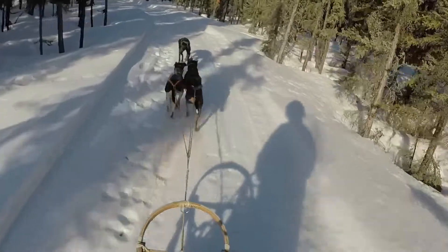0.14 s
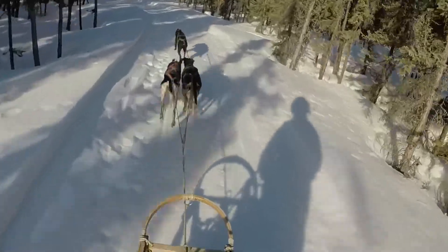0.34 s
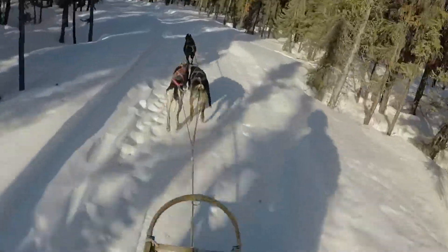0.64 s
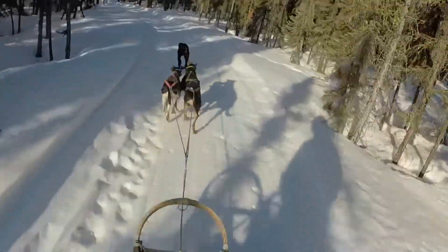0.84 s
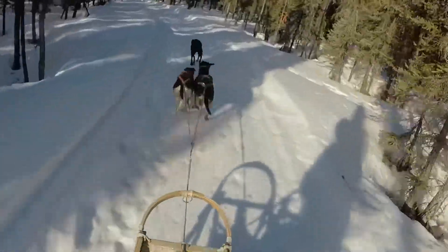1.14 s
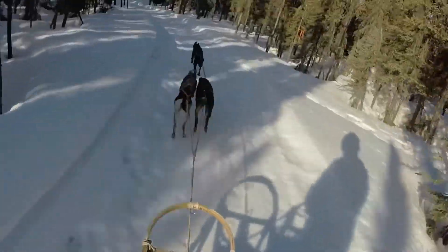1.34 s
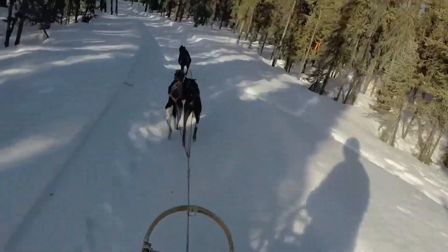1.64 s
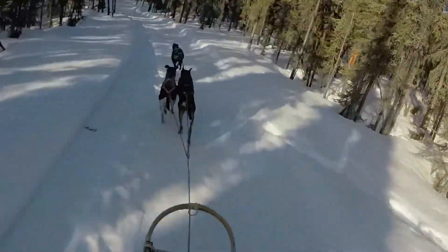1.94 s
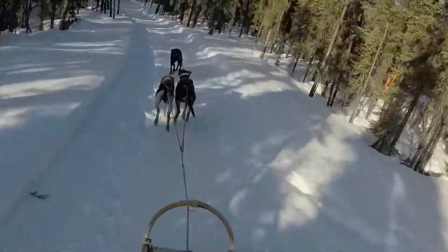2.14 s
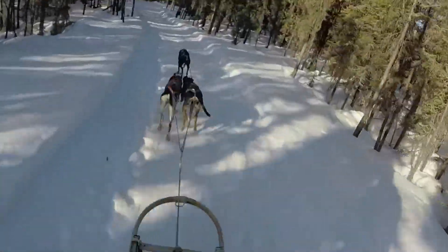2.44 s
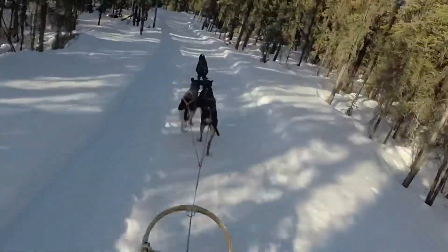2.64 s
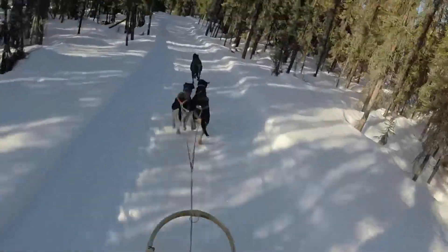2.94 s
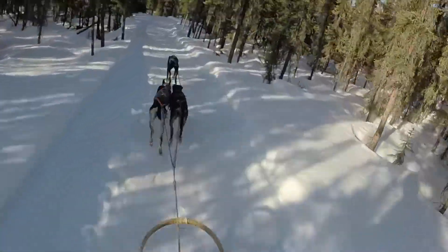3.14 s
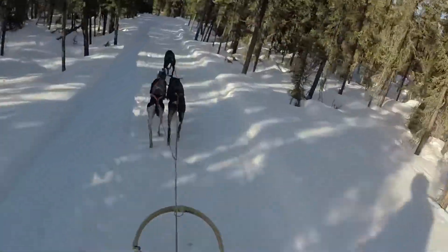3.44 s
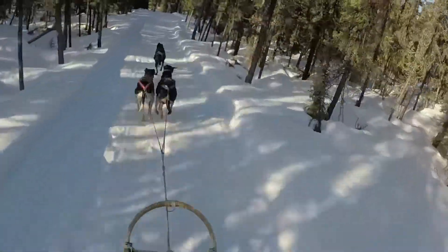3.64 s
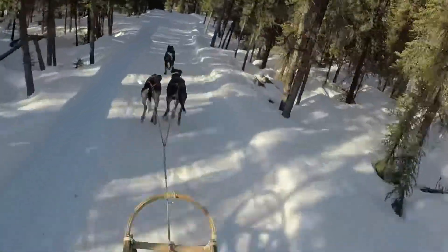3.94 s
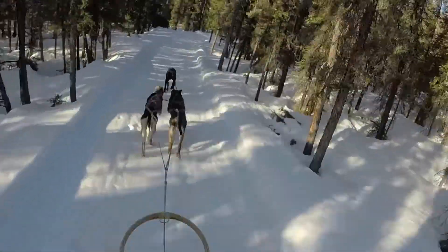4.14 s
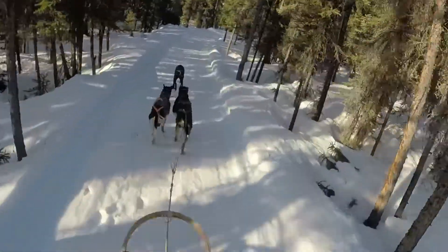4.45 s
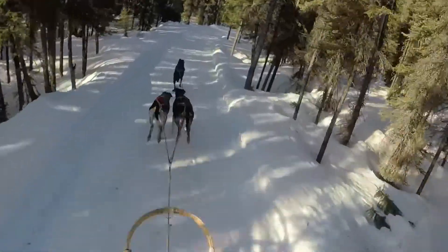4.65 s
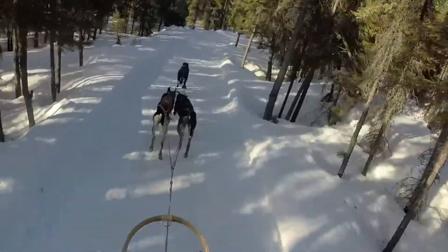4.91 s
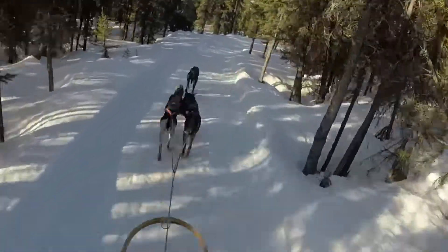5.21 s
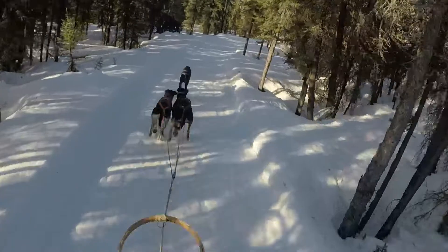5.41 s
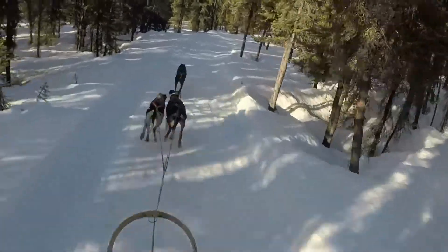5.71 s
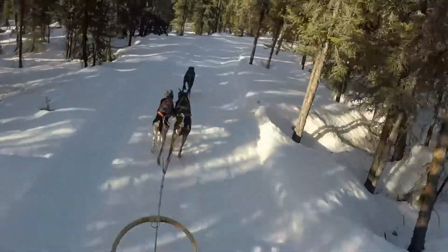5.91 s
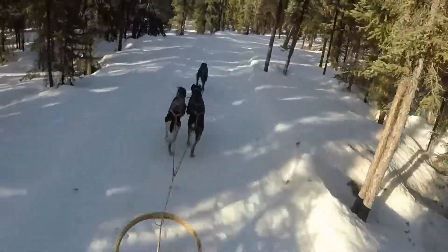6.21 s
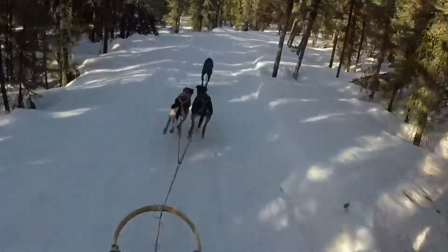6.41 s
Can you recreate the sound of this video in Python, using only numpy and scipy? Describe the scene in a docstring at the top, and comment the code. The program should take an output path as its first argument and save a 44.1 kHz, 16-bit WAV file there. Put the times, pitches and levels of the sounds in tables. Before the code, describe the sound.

Sled runners hiss and scrape over packed snow while the wooden frame rumbles and knocks and deep wind buffets the microphone.

```python
"""Dog sled on packed snow

The runners hiss over snow grains, swish with the team's strides, and scuff, rasp, squeak and crack
over ruts and crust. The rough trail sets the wooden frame rumbling and knocking, and small metal
snaps and fittings on the lines ring faintly. Wind and jolts buffet a microphone the driver carries."""
import sys
import numpy as np
from scipy import signal
from scipy.fft import rfft, irfft
from scipy.io import wavfile
from scipy.ndimage import uniform_filter1d

SR = 44100
rng = np.random.default_rng(int(sys.argv[2]) if len(sys.argv) > 2 else 0)


def persist_wave(psi):
    """Save psi, clipped to +-1, as 16-bit WAV."""
    counts = np.round(np.clip(psi, -1, 1) * 32767).astype(np.int16)
    wavfile.write(sys.argv[1], SR, np.atleast_2d(counts).T)


N = 289737
TIME = np.arange(N) / SR
HZ = np.fft.rfftfreq(N, 1 / SR)

# Levels in the tables are relative: each source adds its own gain.
# steady rubbing of the runners: t/s, level/dB
GLIDE_LEVEL = [(0, -58), (.4, -56), (.51, -60), (.68, -57), (.8, -58.5), (1.0, -58), (1.1, -57.5),
               (1.45, -56), (1.75, -57.5), (2.02, -56.5), (2.25, -56.5), (2.55, -55.5), (2.9, -54),
               (3.17, -56.5), (3.4, -55), (3.65, -57.5), (3.81, -58.5), (3.98, -56.5), (4.1, -57),
               (4.4, -55), (4.9, -54.5), (5.6, -55), (5.95, -57), (6.15, -54.5), (6.57, -55)]
# swishes as the team tugs, about three a second: middle t/s, level/dB
STRIDE_SWISHES = [(.27, -57), (.41, -70), (.94, -58.5), (1.34, -58.5), (1.6, -56), (1.94, -57),
                  (2.2, -57.5), (2.57, -56), (2.78, -56), (3.04, -59), (3.26, -61), (3.51, -58),
                  (3.91, -57.5), (4.31, -57.5), (4.84, -56.5), (5.35, -58), (5.79, -57.5), (6.04, -60),
                  (6.37, -57)]
# tone of crushed snow: f/Hz, level/dB
SNOW_SPECTRUM = [(200, -25.5), (500, -2.5), (800, -4.5), (1050, -3), (1400, 1), (2100, -1.5), (2600, -2),
                 (3200, 0), (4400, -2.5), (5700, -7.5), (8000, -14), (10200, -18.5), (11000, -22.5),
                 (15000, -32.5)]
# peaks and hollows the sled adds to that tone: f/Hz, width/Hz, level/dB
SLED_RESONANCES = [(1566, 38, 4.5), (1930, 240, 3), (2340, 66, 10), (3573, 74, 4.5), (5064, 140, 7.5),
                   (5670, 300, 0), (6230, 150, 3.5), (6610, 400, 5.5), (6820, 430, -8.5), (7600, 300, 3),
                   (8830, 510, -5), (9180, 240, 8)]
# scuffs over ruts and crust: middle t/s, level/dB, centre f/Hz, spread/octaves
RUT_SCUFFS = [(.636, -50, 6300, 0.94), (.919, -56.5, 4500, 1.2), (1.174, -54.5, 4500, 1.5),
              (1.315, -55, 4000, .9), (1.362, -60, 3600, .9), (1.448, -58, 4400, 0.6),
              (1.6, -52.5, 4300, .8), (1.94, -56, 3000, 1.2), (2.163, -54, 6000, 0.89),
              (2.44, -51.5, 1620, 0.55), (2.6, -59, 3500, 0.59), (2.688, -51, 3600, 0.82),
              (2.765, -61, 3500, 0.54), (3.037, -53.5, 3000, 1.5), (3.258, -54.5, 4000, 1.2),
              (3.366, -49.5, 1860, 0.37), (3.468, -55, 4200, .9), (3.497, -55, 5500, 0.65),
              (3.547, -48, 5200, 0.86), (3.757, -59, 4200, 1.1), (4.207, -50, 2410, 1.7),
              (4.283, -57, 3500, 1.2), (4.617, -52.5, 4200, 1.4), (4.828, -47.5, 4500, 1.6),
              (4.872, -50, 1540, 1.2), (5.118, -49, 2330, 1.6), (5.178, -58, 4200, 2.4),
              (5.449, -55, 5000, 1.5), (5.526, -52, 1800, 1.9), (5.769, -52.5, 2700, 0.63),
              (5.875, -52.5, 3500, 1.1), (5.993, -52, 4400, 1.7), (6.052, -50, 3300, 0.75),
              (6.18, -52, 4600, 1.6), (6.254, -54.5, 4400, 0.83), (6.352, -50.5, 2900, 1)]
# a runner rasping over a hard stretch: t/s, level/dB
RASP_LEVEL = [(2.2, -90), (2.35, -60), (2.57, -58), (2.8, -57), (3.0, -70), (3.1, -62), (3.3, -66),
              (3.5, -93)]
# ring of that runner: f/Hz, width/Hz, level/dB
RUNNER_RESONANCES = [(1970, 190, -3), (2370, 140, 1), (2820, 320, -3), (3560, 250, 0), (5020, 130, -7),
                     (5680, 120, -2.5)]
# cold snow squeaking: middle t/s, level/dB, length/s, f/Hz
SNOW_SQUEAKS = [(.291, -51, .012, 1580), (2.443, -53, .02, 1800), (3.366, -49.5, .024, 1900),
                (5.528, -50.5, .02, 1500)]
# icy crust snapping: t/s, level/dB, centre f/Hz
CRUST_CRACKS = [(1.168, -60, 4000), (4.606, -55, 2340), (4.815, -54, 3000), (5.021, -50, 3460),
                (5.118, -55, 2580), (5.168, -58, 1900), (5.522, -53, 1500), (5.763, -60, 2200),
                (5.975, -49.5, 2470), (6.054, -62, 3300), (6.367, -54, 2500), (6.553, -52, 2300)]
# tone of the wooden frame: f/Hz, level/dB
FRAME_SPECTRUM = [(40, -29), (75, 9.5), (105, 7.5), (140, 3.5), (200, -2), (280, -3), (370, -7.5),
                  (450, -6), (620, -7.5), (780, -14), (1200, -22), (3000, -42.5)]
# rise and fall of the rumble in the sled's bed: t/s, level/dB
RUMBLE_LEVEL = [(0, -58), (.4, -52.5), (.7, -54), (1.08, -55), (1.3, -55), (2.1, -55), (2.95, -53),
                (3.15, -54), (3.42, -48), (3.78, -59), (4.08, -53), (4.45, -52.5), (5.25, -50), (5.45, -49),
                (5.66, -53.5), (5.9, -56.5), (6.25, -51), (6.57, -50)]
# how hard the trail shakes the sled: t/s, level/dB
SHAKE_LEVEL = [(0, -60), (2.0, -63.5), (2.5, -60), (3.0, -62.5), (3.35, -62.5), (3.8, -63.5), (4.25, -58),
               (5.0, -60.5), (5.3, -55), (5.75, -59), (6.25, -57), (6.57, -58)]
# hard knocks in loose joints: t/s, level/dB, f/Hz
HARD_KNOCKS = [(.273, -52.5, 600), (.694, -57, 623), (1.274, -54.5, 600), (2.103, -54.5, 550),
               (2.231, -54.5, 570), (2.514, -50, 590), (3.333, -53, 604), (3.362, -54, 550),
               (4.224, -52.5, 604), (4.289, -53.5, 450), (4.485, -51, 517), (4.697, -54, 608),
               (4.89, -53, 620), (5.082, -54, 660), (5.097, -49.5, 545), (5.132, -53, 630),
               (5.163, -48, 430), (5.209, -52, 573), (5.239, -49, 538), (5.266, -50, 550),
               (5.288, -48, 590), (5.305, -53, 586), (5.354, -52, 622), (5.392, -57, 620),
               (5.412, -48, 583), (5.437, -47, 393), (5.508, -53, 595), (5.533, -50, 607),
               (5.571, -52, 540), (5.591, -49.5, 504), (6.235, -51, 444), (6.274, -50, 614)]
# the sled dropping onto hard snow: t/s, level/dB, centre f/Hz
SLED_DROPS = [(1.271, -54.5, 298), (2.231, -43, 118), (2.45, -58, 130), (3.293, -53.5, 257),
              (3.358, -50, 242), (3.865, -47.5, 154), (4.17, -47, 125), (4.729, -57, 270), (4.819, -42, 90),
              (4.868, -50.5, 218), (5.1, -50, 105), (6.21, -59, 120), (6.47, -48, 100)]
# harness snaps touching: t/s, level/dB, chatter length/s, brightness/dB
SNAP_TOUCHES = [(.585, -69, .03, -4), (.79, -61, .045, -8), (.953, -66, .016, 6), (.975, -68, .03, -2),
                (1.145, -66, .05, -4), (1.52, -69, .04, 0), (2.15, -64, .03, -8), (2.925, -66.5, .04, 2.5),
                (3.225, -66, .05, -8)]
# ringing tones of a snap: f/Hz, level/dB, 60 dB fade time/s
SNAP_TONES = [(6093, 0, .13), (7748, -6, .13), (9200, -13, .12), (9930, -14, .08)]
# a tow line fitting shifting: t/s, level/dB, rub length/s, favoured f/Hz
FITTING_RUBS = [(.627, -52.5, 0.019, 4320), (4.535, -44.5, 0.0033, 4000)]
# ringing tones of that fitting: f/Hz, level/dB, 60 dB fade time/s
FITTING_TONES = [(3420, -0.5, 0.039), (4350, -2.5, .05), (4800, -3, 0.056)]
# air flowing over the microphone: t/s, level/dB
WIND_LEVEL = [(0, -41), (1.3, -42.5), (2.1, -43), (2.35, -40.5), (2.65, -34.5), (3.0, -38.5), (3.5, -40.5),
              (3.9, -42), (4.9, -39), (5.3, -40), (5.7, -40), (6.57, -40)]
# tone of the swirling air: f/Hz, level/dB
WIND_SPECTRUM = [(8, -8), (18, 4), (26, -7.5), (45, -8.5), (60, -13.5), (85, -25), (125, -31), (200, -42.5),
                 (400, -68), (1500, -111)]
# gusts and jolts on the microphone: middle t/s, level/dB, f/Hz
GUSTS_AND_JOLTS = [(0.441, -29, 29.8), (.615, -29.5, 27.6), (.905, -27, 27), (0.986, -26, 31.8),
                   (1.2, -26, 31.8), (1.412, -22.5, 25.6), (1.485, -25, 26.6), (1.615, -26, 29),
                   (1.819, -29.5, 27), (1.974, -26, 32), (2.058, -29, 28.2), (2.465, -26, 32),
                   (2.579, -24, 24), (2.694, -22, 26.6), (2.774, -18.5, 23.4), (3.1, -25, 24),
                   (3.324, -22.5, 25.2), (3.658, -27, 25), (3.858, -32, 31.8), (4.217, -25, 30.6),
                   (4.433, -26, 37.5), (4.583, -21, 28.3), (4.833, -23.5, 32.3), (4.898, -21, 30),
                   (4.939, -25, 25), (5.081, -25, 29), (5.162, -24.5, 37.5), (5.325, -24, 39),
                   (5.535, -22.5, 30.5), (6.011, -23, 27.5), (6.116, -26, 29.2), (6.421, -28, 30),
                   (6.535, -31, 36.7)]


def runners(gain_db=0.62, crunch=0.33, flutter_db=0.88, crumble_db=1.15, patchy_db=0.66, brighten=0.51):
    """Sliding runners hiss and break snow crystals; each stride makes them louder and brighter."""
    rubbing = rng.standard_normal(N) + crunch * grains(per_s=2200, spread_db=1.5)
    spectrum = rfft(flexing(rubbing, snow_colour, detune=0.0098))
    friction_db = glide_with_strides()
    stride_db = friction_db - curve(GLIDE_LEVEL)
    centres_hz = np.geomspace(600, 12000, 7)
    hiss = np.zeros(N)
    for share, tilt in zip(np.eye(len(centres_hz)), np.linspace(-1, 1, len(centres_hz))):
        band = irfft(spectrum * np.interp(HZ, centres_hz, share), N)
        hiss += band * amp(patchy_db * wander(rate_hz=19) + brighten * tilt * stride_db)
    hiss *= amp(flutter_db * wander(rate_hz=54) + crumble_db * crumbling(per_s=70, fall_s=0.0093))
    return unit_rms(hiss) * amp(friction_db + gain_db)


def glide_with_strides(length_s=0.058, lean=0.28, gain_db=-0.44):
    """The runners' level in dB: steady rubbing plus a swell for each tug of the team."""
    power = amp(curve(GLIDE_LEVEL)) ** 2
    for s, db in STRIDE_SWISHES:
        near = abs(TIME - s) < 3 * length_s
        power[near] += (amp(db + gain_db) * hump(TIME[near] - s, length_s, lean)) ** 2
    return 10 * np.log10(power)


def scuffs(gain_db=0.16, length_s=0.021, crunch=0.44, crumble_db=2.86, floor=0.086):
    """A runner bites harder for a moment: a clump of grains, dull in soft snow and bright on crust."""
    snow = shaped(rng.standard_normal(N) + crunch * grains(per_s=1300, spread_db=5), snow_colour())
    snow *= amp(crumble_db * crumbling(per_s=180, fall_s=0.0034))
    out = np.zeros(N)
    for s, db, hz, octaves in RUT_SCUFFS:
        near = abs(TIME - s) < .1
        piece = snow[near]
        freqs = np.fft.rfftfreq(len(piece), 1 / SR) + 1
        scrape = irfft(rfft(piece) * (floor + focus(freqs, hz, octaves)), len(piece))
        pressure = hump(TIME[near] - s, length_s, lean=0.22)
        out[near] += amp(db + gain_db) * pressure * unit_rms(scrape)
    return out


def rasp(crunch=0.64, flutter_db=3.5):
    """On hard snow a runner catches and slips so fast that it keeps ringing."""
    rubbing = rng.standard_normal(N) + crunch * grains(per_s=610, spread_db=-3)
    ring = flexing(rubbing, runner_colour, detune=.02)
    return unit_rms(ring) * amp(curve(RASP_LEVEL) + flutter_db * wander(rate_hz=13))


def squeaks(gain_db=-1.0, waver=.1):
    """Cold snow sticks and slips at an unsteady rate for a few dozen cycles."""
    unsteady_time = np.cumsum(1 + waver * wander(rate_hz=450)) / SR
    return sum(amp(db + gain_db) * hump(TIME - s, length_s) * np.sin(2 * np.pi * hz * unsteady_time)
               for s, db, length_s, hz in SNOW_SQUEAKS)


def cracks(gain_db=4.0):
    """The crust gives way all at once with a brief, bright crunch."""
    return amp(gain_db) * bursts(CRUST_CRACKS, rise_s=0.0013, octaves=0.68)


def frame(gain_db=-54.0, rattle=0.92, shake_share=0.72, rumble_share=0.9, uneven_db=1.5, split_hz=300):
    """Small jolts keep the sled drumming: the bed rumbles low and the slats chatter above it."""
    jolts = rng.standard_normal(N) + rattle * grains(per_s=160, spread_db=3.5)
    body = shaped(jolts, spectrum_db(FRAME_SPECTRUM))
    bed = lows(body, split_hz)
    slats = body - bed
    bed_db = rumble_share * curve(RUMBLE_LEVEL) + uneven_db * wander(rate_hz=14)
    slats_db = shake_share * curve(SHAKE_LEVEL)
    return amp(gain_db) * (bed * amp(bed_db - bed_db.mean()) + slats * amp(slats_db - slats_db.mean()))


def knocks(gain_db=5.0, rise_s=0.0022, sag=0.038, bounce_s=0.011, bounce_db=-7):
    """Lashed wooden joints knock: a soft start, a few cycles of ring, then a weaker rebound."""
    t, out = np.arange(SR // 25) / SR, np.zeros(N)
    rows = HARD_KNOCKS + light_knocks()
    for (s, db, hz), (phase, softness, slack) in zip(rows, rng.random((len(rows), 3))):
        age = t / (rise_s * 2 ** (softness - .5))
        cycles = hz * t * (1 + sag * np.exp(-age / 2))  # the pitch starts a little high
        ring = age * np.exp(1 - age) * np.sin(2 * np.pi * (cycles + phase))
        add(out, s, amp(db + gain_db) * ring)
        add(out, s + bounce_s * (1 + slack), amp(db + gain_db + bounce_db) * ring)
    return out


def light_knocks(per_s=11, centre_hz=513, octaves=0.44, over_shake_db=1.5, spread_db=3.5):
    """Chance knocks, stronger where the trail is rough, as rows like HARD_KNOCKS."""
    delay, weakness, pitch = rng.random((200, 3)).T
    times = (np.arange(len(delay)) + delay) / per_s
    db = curve(SHAKE_LEVEL, times) + over_shake_db - spread_db * (2 * weakness - 1)
    hz = centre_hz * 2 ** (octaves * (2 * pitch - 1))
    return list(zip(times, db, hz))


def bumps(gain_db=-1.5):
    """Heavier drops push the whole frame into a short, dull thud."""
    return amp(gain_db) * bursts(SLED_DROPS, rise_s=0.0076, octaves=0.46)


def harness_snaps(chatter_db=4.5, waver_hz=30):
    """A snap chatters against its ring, then dies away; some touches ring bright, others dull."""
    t, out = np.arange(SR // 3) / SR, np.zeros(N)
    bright_shares = np.linspace(0, 1, len(SNAP_TONES)) ** .5
    for s, db, length_s, bright_db in SNAP_TOUCHES:
        swell = np.sqrt(np.minimum(2 * t / length_s, 1))
        since_release = np.maximum(t - length_s, 0)
        for (hz, tone_db, fade_s), share in zip(SNAP_TONES, bright_shares):
            waver, chatter = smooth_noise(len(t), width=260), smooth_noise(len(t), width=260)
            ring = np.sin(2 * np.pi * np.cumsum(hz + waver_hz * waver) / SR)
            ring_db = db + tone_db + bright_db * share + chatter_db * chatter
            add(out, s, swell * ring * amp(ring_db - 60 * since_release / fade_s))
    return out


def fitting_clinks(rise_s=0.0023, rub=0.69):
    """A metal fitting on the tow line rubs under load and rings on: a soft, gritty clink."""
    t, out = np.arange(SR // 8) / SR, np.zeros(N)
    swell = np.minimum(t / rise_s, 1)
    for s, db, length_s, favoured_hz in FITTING_RUBS:
        since_release = np.maximum(t - length_s, 0)
        for hz, tone_db, fade_s in FITTING_TONES:
            grit = 1 + rub * smooth_noise(len(t), width=30)
            ring = np.sin(2 * np.pi * (hz * t + rng.random())) * focus(hz, favoured_hz, octaves=.3)
            add(out, s, swell * grit * ring * amp(db + tone_db - 60 * since_release / fade_s))
    return out


def wind(gain_db=4.0, deep_hz=54, flutter_share=0.64, flutter_db=-2.5):
    """Air swirls on the microphone: the deepest swings follow the airflow, finer flutter only in part."""
    swirls = shaped(rng.standard_normal(N), spectrum_db(WIND_SPECTRUM))
    strength = np.sqrt(uniform_filter1d(abs(signal.hilbert(swirls)) ** 2, size=3000) + 1e-9)
    swirls = unit_rms(swirls / strength)  # evens out chance swells
    deep = lows(swirls, deep_hz)
    flow_db = curve(WIND_LEVEL)
    softened_db = flutter_share * flow_db + (1 - flutter_share) * flow_db.mean()
    return amp(gain_db) * (deep * amp(flow_db) + (swirls - deep) * amp(softened_db + flutter_db))


def thumps(gain_db=1.0, roundness=3.1):
    """A gust or jolt is one push of pressure and its rebound; the rounder it is, the duller it sounds."""
    t, out = np.arange(-SR // 8, SR // 8) / SR, np.zeros(N)
    for (s, db, hz), phase in zip(GUSTS_AND_JOLTS, rng.random(len(GUSTS_AND_JOLTS))):
        swing = np.exp(2j * np.pi * phase) / (1 - 2j * np.pi * hz * t / roundness) ** roundness
        add(out, s + t[0], amp(db + gain_db) * swing.real)
    return out


def snow_colour(stretch=1):
    """Spectrum in dB of crushed snow heard through the sled; stretch retunes the resonances."""
    peaks_db = sum(db * resonance(hz * stretch, width) for hz, width, db in SLED_RESONANCES)
    return spectrum_db(SNOW_SPECTRUM) + peaks_db


def runner_colour(stretch):
    """Spectrum in dB of a ringing runner; stretch retunes it."""
    peaks = sum(amp(db) * resonance(hz * stretch, width) for hz, width, db in RUNNER_RESONANCES)
    return 20 * np.log10(peaks)


def flexing(sound, colour, detune):
    """The sled flexes under load, so its tone drifts between a higher and a lower tuning."""
    load = .5 + .5 * np.tanh(wander(rate_hz=6.5))
    return load * shaped(sound, colour(1 + detune)) + (1 - load) * shaped(sound, colour(1 - detune))


def grains(per_s, spread_db):
    """Random clicks of uneven size."""
    sizes = amp(spread_db * np.minimum(rng.exponential(1, N), 4)) * rng.choice([-1., 1.], N)
    return unit_rms(sizes * (rng.random(N) < per_s / SR))


def crumbling(per_s, fall_s):
    """Tiny collapses of the snow: each makes the level jump up, then fade."""
    jumps = rng.exponential(1, N) * (rng.random(N) < per_s / SR)
    level = np.sqrt(signal.lfilter([1], [1, -np.exp(-1 / (fall_s * SR))], jumps))
    return unit_rms(level - level.mean())


def bursts(rows, rise_s, octaves):
    """Short puffs of noise around a centre pitch, with a quick rise and a longer fall."""
    size, out = SR // 10, np.zeros(N)
    age = np.arange(size) / SR / rise_s
    freqs = np.fft.rfftfreq(size, 1 / SR) + 1
    force = age * np.exp(1 - age)
    for (s, db, hz), noise in zip(rows, rng.standard_normal((len(rows), size))):
        puff = force * irfft(rfft(noise) * focus(freqs, hz, octaves), size)
        add(out, s, amp(db) * puff * np.linalg.norm(force) / np.linalg.norm(puff))
    return out


def hump(t, length_s, lean=0):
    """A smooth swell near t = 0; lean makes it rise faster than it falls."""
    offset = t / length_s + lean / 2
    return np.exp(-np.pi / 2 * (offset / (1 + lean * np.sign(offset))) ** 2)


def wander(rate_hz):
    """A random drift, up to about rate_hz swings a second."""
    return unit_rms(irfft(rfft(rng.standard_normal(N)) / np.sqrt(1 + (HZ / rate_hz) ** 4), N))


def smooth_noise(size, width):
    """Noise averaged over width samples."""
    return unit_rms(uniform_filter1d(rng.standard_normal(size), size=width))


def resonance(hz, width_hz):
    """A peak of height 1 in the spectrum."""
    return 1 / (1 + (2 * (HZ - hz) / width_hz) ** 2)


def focus(freqs, centre_hz, octaves):
    """A bell-shaped gain around one pitch."""
    return np.exp(-.5 * (np.log2(freqs / centre_hz) / octaves) ** 2)


def lows(sound, edge_hz):
    """Keeps what lies below edge_hz."""
    return irfft(rfft(sound) / (1 + (HZ / edge_hz) ** 6), N)


def shaped(sound, db):
    """Filters by a dB spectrum and scales to rms 1."""
    return unit_rms(irfft(rfft(sound) * amp(db), N))


def spectrum_db(rows):
    """Joins (f/Hz, level/dB) rows by straight lines on a log frequency axis."""
    hz, db = np.transpose(rows)
    return np.interp(np.log(HZ + 1), np.log(hz), db)


def curve(rows, times=TIME):
    """Joins (t/s, level/dB) rows by straight lines."""
    return np.interp(times, *np.transpose(rows))


def amp(db):
    """Turns decibels into gain."""
    return 10 ** (np.asarray(db) / 20)


def unit_rms(x):
    """Scales to an average size (rms) of 1."""
    return x / np.sqrt(np.mean(x ** 2) + 1e-20)


def add(mix, s, sound):
    """Mixes a sound in at s seconds."""
    part = mix[max(round(s * SR), 0):][:len(sound)]
    part += sound[:len(part)]


def scene():
    """Everything is close by, in open air over snow, so there is no echo."""
    snow = runners() + scuffs() + rasp() + squeaks() + cracks()
    sled = frame() + knocks() + bumps() + harness_snaps() + fitting_clinks()
    return (snow + sled + wind() + thumps())[None]


def record(dry):
    """The highest treble is cut off."""
    treble_cut = signal.firwin(511, cutoff=15100, window=("kaiser", 9), fs=SR)
    return signal.oaconvolve(dry, treble_cut[None], "same")


dry = scene()
out = record(dry)
persist_wave(out)
```